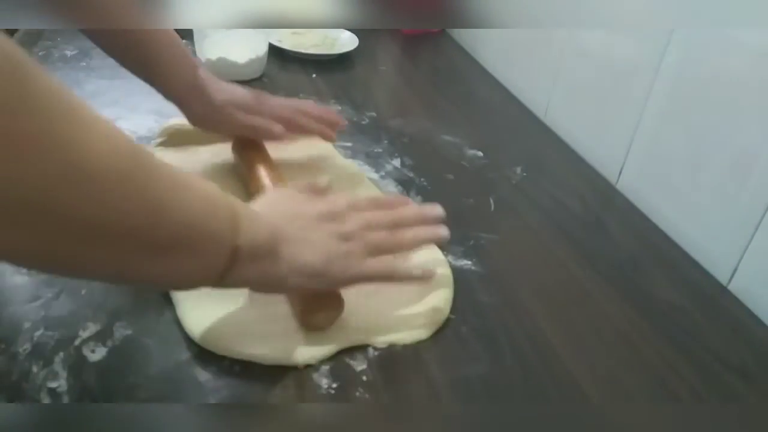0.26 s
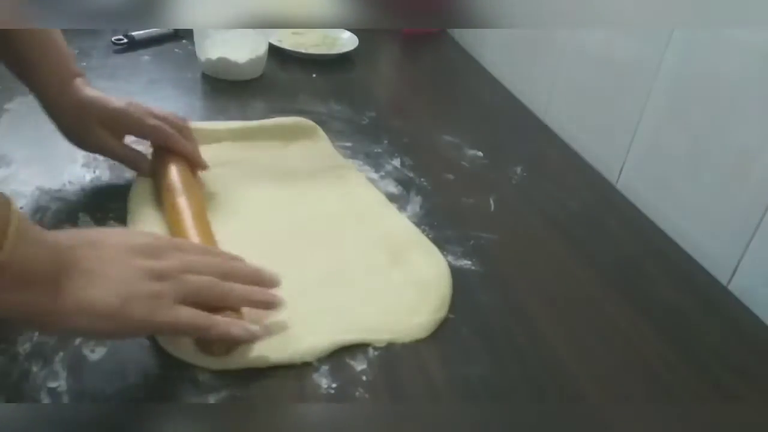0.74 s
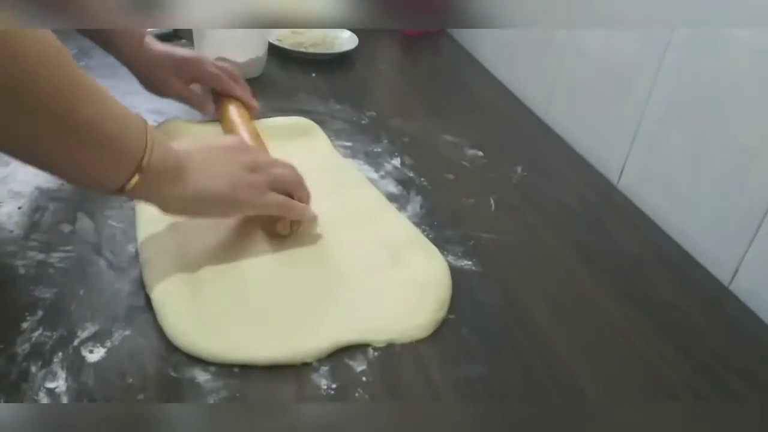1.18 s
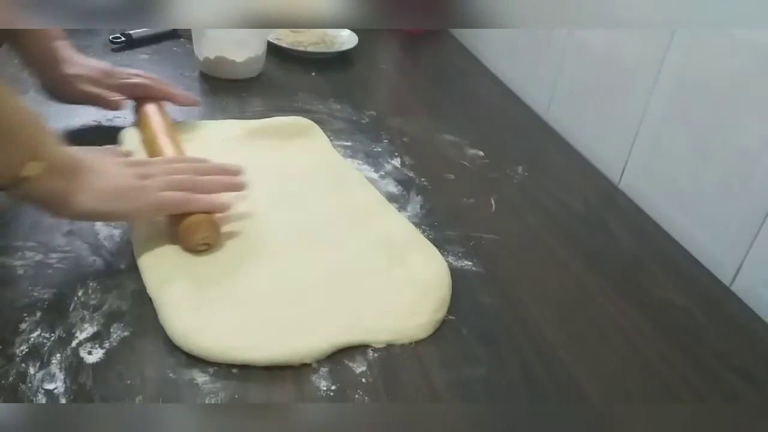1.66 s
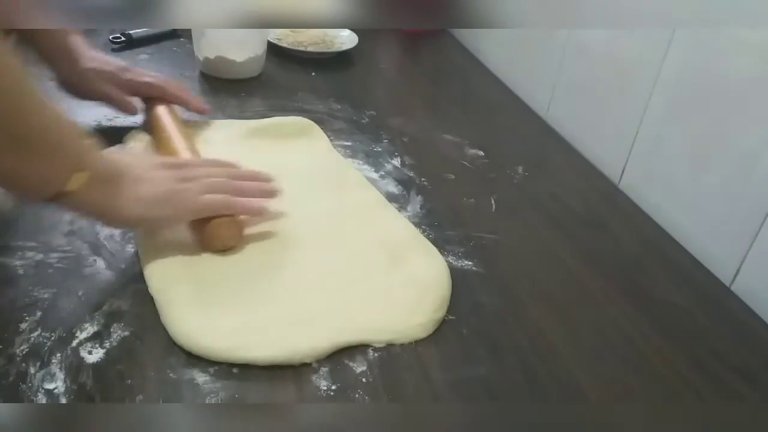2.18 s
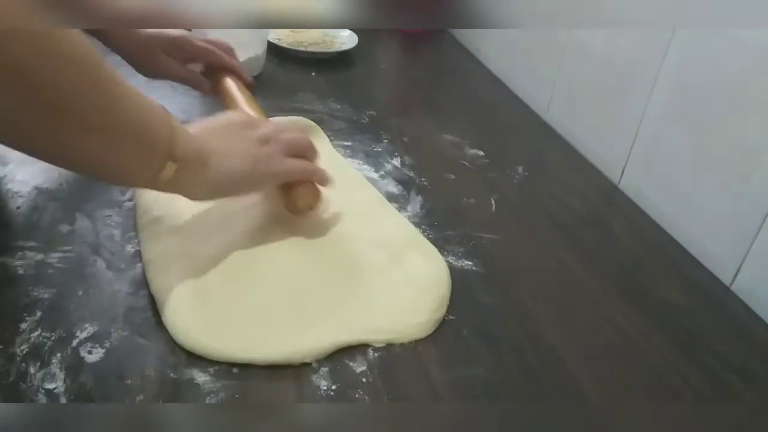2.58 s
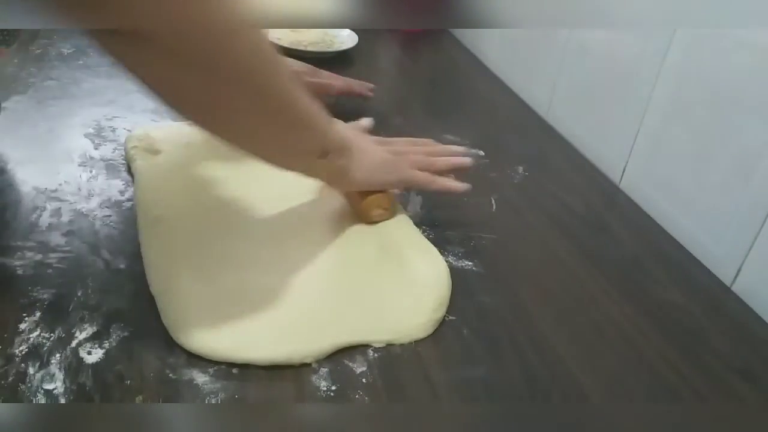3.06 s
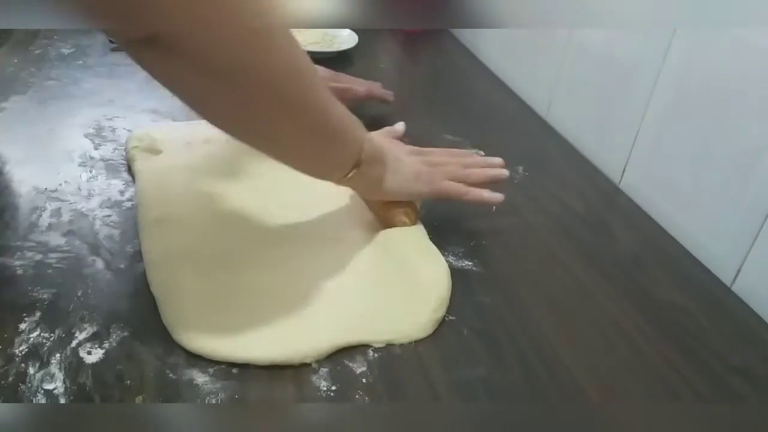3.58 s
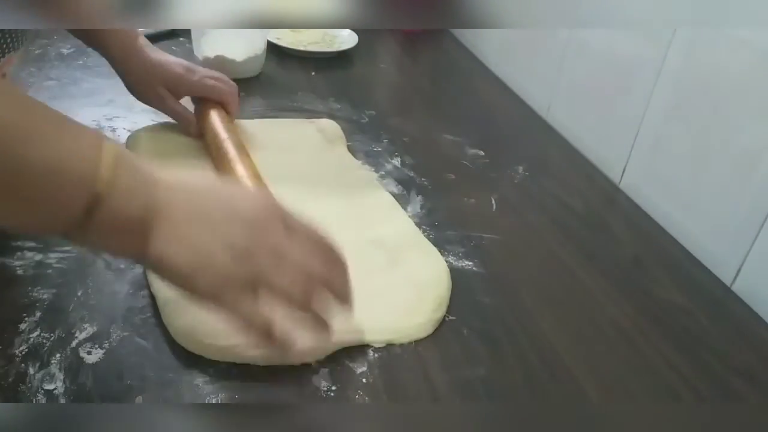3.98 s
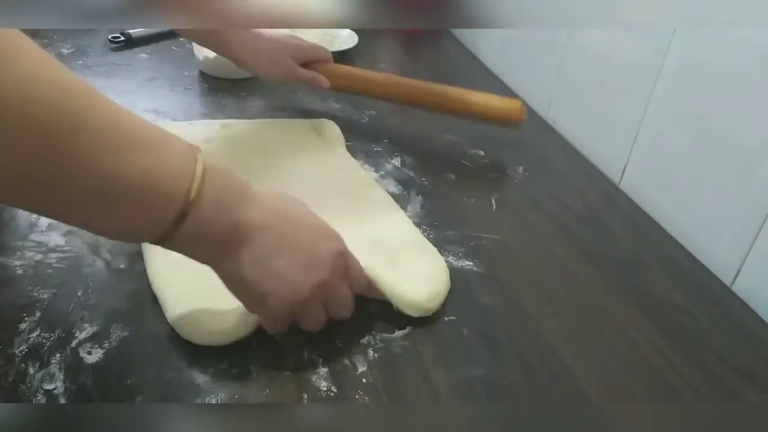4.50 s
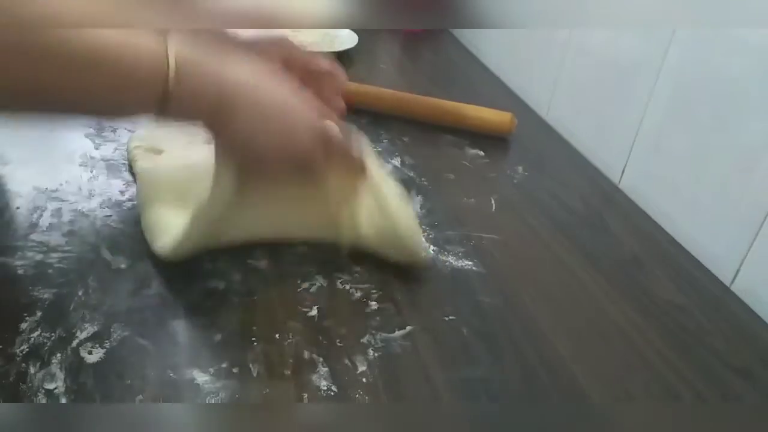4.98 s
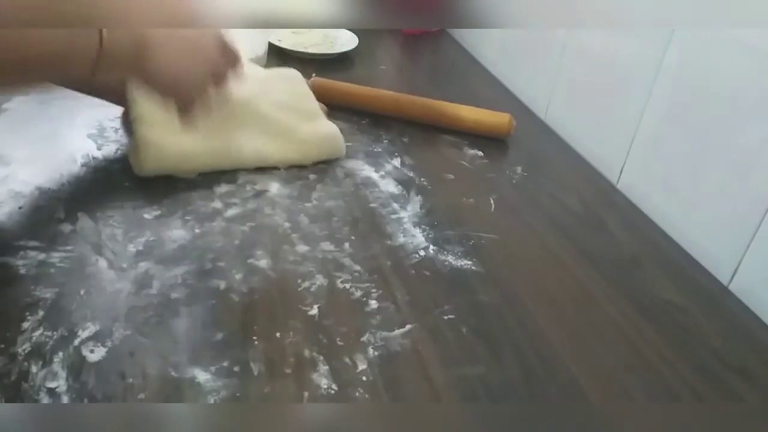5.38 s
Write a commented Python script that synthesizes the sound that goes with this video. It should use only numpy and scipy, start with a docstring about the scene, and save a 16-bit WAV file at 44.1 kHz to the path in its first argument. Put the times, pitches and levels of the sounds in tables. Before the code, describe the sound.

A wooden rolling pin works dough on a floured counter with soft rubs, dull thumps and knocks, then the sheet is lifted and flops down heavily.

```python
"""Small tiled kitchen: a wooden rolling pin flattens dough on a floured counter, close to a phone.
Palms rub the pin and flour crackles (shaped noise and sparse grains); pin and hands bump and knock, the pin
judders (filtered pulses, a wavering low tone), and the counter booms (decaying resonances, low noise).
Near the end the sheet of dough is peeled up, flaps against a hand and flops down folded."""
import sys
import numpy as np
from scipy import signal
from scipy.fft import rfft, irfft, next_fast_len
from scipy.io import wavfile
from scipy.ndimage import uniform_filter1d

SR = 44100
rng = np.random.default_rng(int(sys.argv[2]) if len(sys.argv) > 2 else 0)


def wav_out(sig):
    """Save sig, one row per channel (or a flat mono array), as 16-bit PCM at SR to the path in sys.argv[1]."""
    wavfile.write(sys.argv[1], SR, np.round(np.clip(np.atleast_2d(sig).T, -1, 1) * 32767).astype(np.int16))


N = 248591
T = np.arange(N) / SR
RING = 32768  # samples in one blow's response

# Flour spectrum: (frequency [Hz], level [dB])
FLOUR = [(2500, -8.5), (4000, -2.5), (4900, 3), (6000, 1), (7300, 4), (8700, 8), (9400, 5), (10300, -3.5),
         (11500, 0), (13000, -4)]
# Background noise spectrum: (frequency [Hz], level [dB])
QUIET = [(30, 4), (100, -4.5), (200, -8.5), (400, -11.5), (1000, -15), (3000, -20), (6000, -23),
         (13000, -28.5)]


def undb(db):
    """Decibels to gain."""
    return 10 ** (np.asarray(db) / 20)


def unit(x):
    """Scale to rms 1."""
    return x / np.sqrt(np.mean(x ** 2))


def at_hz(points, hz):
    """Read (Hz, value) points on a log-frequency axis."""
    f, value = np.transpose(points)
    return np.interp(np.log(hz + 1e-3), np.log(f), value)


def shape(x, spectrum):
    """Filter by (Hz, dB) points."""
    size = next_fast_len(len(x))
    gain = undb(at_hz(spectrum, np.fft.rfftfreq(size, 1 / SR)))
    return irfft(rfft(x, size) * gain, size)[:len(x)]


def colour(x, spectrum):
    """Give a steady sound a spectrum; rms 1."""
    return unit(shape(x, spectrum))


def band(x, hz, kind, order=2):
    """Smooth low-, high- or band-pass."""
    return signal.sosfilt(signal.butter(order, hz, kind, fs=SR, output="sos"), x)


def click(spectrum):
    """Minimum-phase pulse: the shortest causal one with this spectrum."""
    cepstrum = irfft(np.log(undb(at_hz(spectrum, np.fft.rfftfreq(RING, 1 / SR)))))
    cepstrum[1:RING // 2] *= 2
    cepstrum[RING // 2 + 1:] = 0
    return irfft(np.exp(rfft(cepstrum)))[:RING // 8]


def walk(rate_hz):
    """Smooth random wander of rms 1, with rate_hz new values per second."""
    size = int(SR / rate_hz)
    steps = np.repeat(rng.standard_normal(N // size + 1), size)
    return unit(uniform_filter1d(steps, size)[:N])


def add(out, s, x):
    """Mix x into out from time s."""
    i = int(s * SR)
    out[i:i + len(x)] += x[:N - i]


def swell(s, length_s, rise_share, sag_db, t60_s):
    """One movement: it rises for a share of its length, sags while it lasts, then dies away."""
    progress = np.clip((T - s) / length_s, 0, 1)
    attack = np.minimum(progress / rise_share, 1)
    release = np.exp(-np.log(1000) * np.maximum(T - s - length_s, 0) / t60_s)
    return attack * undb(-sag_db * progress) * release


def movements(rows, rise_share, sag_db, t60_s):
    """Loudness of (s, length s, dB) movements; where they overlap their powers add."""
    return np.sqrt(sum((undb(db) * swell(s, length_s, rise_share, sag_db, t60_s)) ** 2
                       for s, length_s, db in rows))


def contact(spread_s, crisp_hz=2500):
    """A soft surface lands as one push; its treble is spread over the moments its patches touch."""
    t = np.arange(RING // 32) / SR
    push = 1. * (t == 0)
    patches = rng.standard_normal(len(t)) * np.exp(-t / spread_s)
    patches /= np.linalg.norm(patches)
    return band(push, crisp_hz, "low") + band(patches, crisp_hz, "high")


def kitchen(direct_db, spread_s, wall_s=.0083, wall_db=-3, build_s=0.0032, diffuse_hz=170):
    """One contact: direct sound, one tiled-wall echo and a random dense tail."""
    # direct_db is relative to the tail's energy, wall_db to the direct sound
    # Reverberation: (frequency [Hz], t60 [s])
    reverb = [(80, 0.37), (210, 0.4), (560, 0.29), (1500, 0.32), (4000, 0.3), (12000, 0.28)]
    t, hz = np.arange(RING) / SR, np.fft.rfftfreq(RING, 1 / SR)
    noise = rfft(rng.standard_normal(RING))
    tail = 0
    for share, (_, t60_s) in zip(np.eye(len(reverb)), reverb):
        weight = at_hz([(f, w) for (f, _), w in zip(reverb, share)], hz)
        tail = tail + irfft(noise * weight) * np.exp(-np.log(1000) * t / t60_s)
    build = 1 - np.exp(-t / build_s)
    path = unit(band(tail, diffuse_hz, "high", order=1) * build) / np.sqrt(RING)
    add(path, 0, undb(direct_db) * contact(spread_s))
    add(path, wall_s, undb(direct_db + wall_db) * contact(spread_s))
    return path


def counter(ring_db=15, longest_t60_s=.55):
    """Decaying resonances that ring after each blow; their strengths vary by about 1 dB."""
    # Resonances: (frequency [Hz], level before ring_db [dB], t60 before the cap [s])
    resonances = [(60.5, -7, .6), (80, -18, 0.45), (95.6, -7, 0.44), (125.3, -5.5, 0.46), (135, -7, 0.34),
                  (140.8, -4.5, 0.24), (183.9, -5.5, 0.46), (274.4, -3.5, 0.38), (305, -8, 1),
                  (332.9, -2.5, 0.35), (368, -31, 0.99), (447, -24, 0.2), (427, -19, 0.58),
                  (551, -7.5, 0.36), (678, -19, 0.25), (852, -55, .3), (1059, -1.5, 0.22),
                  (1160, -3.5, 0.28), (1328, -4.5, 0.2), (1443, -25, 0.99), (1932, -1, 0.2),
                  (2140, -4.5, 0.48), (2324, -4.5, 0.24)]
    t = np.arange(RING) / SR
    out = 0
    for (hz, db, t60_s), chance_db in zip(resonances, rng.standard_normal(len(resonances))):
        decay = np.log(1000) / min(t60_s, longest_t60_s)
        gain = undb(ring_db + db + chance_db) * 2 * decay / SR
        out = out + gain * np.exp(-decay * t) * np.cos(2 * np.pi * hz * t)
    return out


def blows(rows, spectrum, direct_db, spread_s, alike):
    """Contacts, dulled by softness, ring counter and room; alike is the share of common echoes."""
    out, pulse, spot = np.zeros(N), click(spectrum), kitchen(direct_db, spread_s)
    for s, db, soft_hz, bass_hz, ring_db in rows:
        path = alike * spot + (1 - alike) * kitchen(direct_db, spread_s)
        x = signal.fftconvolve(path + undb(ring_db) * counter(), pulse)
        x = band(band(x, soft_hz, "low"), bass_hz, "high")
        add(out, s, undb(db) * x / np.std(x[:SR // 20]))  # level over the first 50 ms
    return out


def thumps_and_knocks():
    """Low thumps and knocks on the counter, from the pin and from hands."""
    # Knocks: (time [s], level [dB], low-pass [Hz], high-pass [Hz], relative counter ring [dB])
    knocks = [(0.352, -66, 106, 54.5, 8), (0.405, -65, 171, 72, 4), (0.667, -39, 135, 73.5, -10),
              (0.712, -38.5, 390, 94, -5), (0.890, -63.5, 393, 155, -11), (1.290, -65.5, 174, 110, 8),
              (1.345, -64.5, 171, 105, 19), (1.747, -51, 1210, 47.7, -32), (1.790, -44.5, 1880, 190, -8),
              (1.823, -58, 1200, 157, 23), (2.033, -54.5, 930, 215, -5.5), (2.078, -63, 397, 316, 7),
              (2.376, -52, 280, 94.5, 1.5), (2.420, -44.5, 114, 80, -10), (2.750, -64.5, 138, 80, 21),
              (3.226, -42, 127, 70.4, 17), (3.239, -48.5, 2330, 221, -33), (3.253, -59, 700, 149, -8),
              (3.2688, -40.5, 2060, 310, -0.5), (3.277, -63, 1770, 616, 15), (3.301, -59, 2070, 520, 9),
              (4.563, -66.5, 150, 80, 23), (4.675, -59.5, 750, 150, -23), (4.692, -58, 670, 141, -12),
              (4.846, -62.5, 181, 90, 19)]
    # Contact spectrum: (frequency [Hz], level [dB])
    knock_spectrum = [(45, -14), (65, 11.5), (110, 6.5), (150, 0.5), (200, -0.5), (270, -2.5), (350, -1),
                      (470, -8.5), (750, -10.5), (900, -18.5), (1100, -16.5), (1600, -15.5), (2100, -23),
                      (3000, -27), (6000, -19), (12000, -16)]
    return blows(knocks, knock_spectrum, direct_db=-12.5, spread_s=0.00096, alike=0.13)


def rolling(trim_db=-0.9):
    """Pushes that bear down on the counter make it rumble: low noise under their envelopes."""
    # Pushes: (time [s], length [s], level before trim [dB])
    pushes = [(0.0, 0.24, -74.5), (0.325, 0.16, -66), (0.93, .2, -71), (1.26, 0.19, -65), (2.13, 0.36, -73),
              (2.6, 0.32, -68.5), (3.44, 0.075, -66), (3.7, 0.44, -76.5), (4.28, 0.13, -69),
              (4.66, 0.63, -66), (5.5, .14, -69)]
    # Rumble spectrum: (frequency [Hz], level [dB])
    rumble = [(25, -29), (45, -17), (75, 8.5), (105, 8.5), (135, 12.5), (190, -8), (300, -8), (500, -28),
              (1000, -29.5)]
    weight = movements(pushes, rise_share=0.078, sag_db=-0.5, t60_s=0.76)
    return colour(rng.standard_normal(N), rumble) * undb(trim_db) * weight


def judder(slip_hz=155, jitter=0.0205, second_db=-23, third_db=-28, rough_db=-21):
    """Stick-slip of the pin: a short, nearly pure groan of wavering pitch, with faint scrape noise."""
    # Catches and slips: (time [s], length [s], level [dB])
    slips = [(2.295, 0.073, -56.5), (2.372, .11, -40), (2.52, 0.035, -47.5)]
    phase = 2 * np.pi * np.cumsum(slip_hz * (1 + jitter * walk(50.5))) / SR
    second = undb(second_db) * np.sin(2 * phase) * walk(41)
    third = undb(third_db) * np.sin(3 * phase) * walk(33)
    groan = unit(np.sin(phase) + second + third)
    scrape = unit(band(rng.standard_normal(N), [170, 380], "band"))
    slipping = movements(slips, rise_share=0.23, sag_db=4, t60_s=0.19)
    return (groan + undb(rough_db) * scrape) * slipping


def drift(x, patchy_db=2.0, size=512):
    """Hollows under the moving hands keep changing, so soft resonances come and go."""
    frames = signal.stft(x, nperseg=size)[2]
    chance = rng.standard_normal(frames.shape)
    chance = uniform_filter1d(chance, size=4, axis=0)  # across frequency
    chance = unit(uniform_filter1d(chance, size=16, axis=1))  # across time
    return signal.istft(frames * undb(patchy_db * chance), nperseg=size)[1][:N]


def rubbing(hiss_trim_db=-0.05, skin_trim_db=-2.5, grain_db=3.5, grains_per_s=4000,
            flicker_db=1.35, wash_db=3):
    """Flour slips under skin and dough: sparse random grains over a dense noise wash."""
    # Strokes: (time [s], length [s], flour hiss before trim [dB], lower skin rub before trim [dB])
    strokes = [(0, .06, -68.5, -74.5), (0.093, .11, -70.5, -67.5), (0.32, 0.15, -75.5, -73),
               (0.434, 0.031, -58, -67), (0.619, .075, -73.5, -64), (0.843, 0.13, -83, -71),
               (0.927, .26, -64, -63.5), (1.185, .15, -64, -63.5), (1.399, 0.069, -76, -70),
               (1.533, 0.058, -74, -68), (1.707, 0.14, -71, -65), (1.998, 0.09, -78, -64),
               (2.055, .21, -61.5, -64.5), (2.345, 0.2, -65.5, -70.5), (2.661, .15, -67, -75),
               (2.893, 0.068, -64.5, -67), (3.147, 0.072, -81, -68.5), (3.214, 0.047, -67, -61),
               (3.33, .19, -68.5, -64.5), (3.615, 0.11, -67.5, -70.5), (3.789, .11, -77, -67.5),
               (3.967, 0.16, -69.5, -71.5), (4.199, 0.22, -69, -65), (4.52, .07, -77, -72),
               (4.638, 0.076, -73.5, -67.5), (4.748, .1, -69, -64), (4.828, .18, -65.5, -63.5),
               (5.112, 0.17, -68, -73), (5.47, .16, -56.5, -60.5)]
    # Skin rub spectrum: (frequency [Hz], level [dB])
    skin_spectrum = [(300, -7), (700, -4), (1150, -6.5), (1750, -0.5), (2200, -4.5), (3100, -2),
                     (4200, -3.5), (7000, -14.5)]
    starts, lengths, hiss_db, skin_db = np.transpose(strokes)
    # last column, floor_db: a faint steady hiss continues between strokes
    layers = ((FLOUR, hiss_trim_db + hiss_db, -86.5), (skin_spectrum, skin_trim_db + skin_db, -87))
    out = 0
    for spectrum, db, floor_db in layers:
        sliding = movements(zip(starts, lengths, db), rise_share=0.37, sag_db=2, t60_s=0.31)
        sizes = undb(grain_db * np.minimum(rng.exponential(size=N), 4)) * rng.standard_normal(N)
        grains = unit(sizes * (rng.random(N) < grains_per_s / SR))
        wash = undb(wash_db) * rng.standard_normal(N)
        loudness = np.hypot(sliding, undb(floor_db)) * undb(flicker_db * walk(40))
        out = out + colour(grains + wash, spectrum) * loudness
    return drift(out)


def brushes():
    """Short strokes of skin on wood; a hollow hand picks out one note: band-passed noise."""
    # Strokes: (time [s], length [s], centre [Hz], width [Hz], level [dB])
    notes = [(0.172, 0.031, 4800, 900, -66), (1.259, 0.046, 1890, 150, -64.5),
             (1.426, 0.012, 3100, 170, -64), (2.089, 0.08, 2550, 160, -63), (2.19, 0.068, 5130, 900, -66),
             (3.47, 0.083, 2300, 400, -77), (3.613, 0.073, 1540, 150, -76.5), (3.851, 0.04, 3800, 280, -67),
             (4.299, 0.03, 1610, 140, -70.5), (4.551, 0.038, 1780, 90, -73),
             (4.552, 0.025, 3120, 140, -70.5)]
    out = np.zeros(N)
    for s, length_s, hz, width_hz, db in notes:
        edges_hz = [hz - width_hz / 2, hz + width_hz / 2]
        hiss = unit(band(rng.standard_normal(N), edges_hz, "band", order=1))
        out += undb(db) * hiss * swell(s, length_s, rise_share=0.17, sag_db=2, t60_s=0.22)
    return out


def palm_slaps():
    """Palms slap down: bright, briefly spread contacts."""
    # Slaps: (time [s], level [dB], low-pass [Hz], high-pass [Hz], relative counter ring [dB])
    slaps = [(0.6685, -39, 13900, 155, -16), (0.679, -40.5, 8850, 108, 2.5)]
    # Contact spectrum: (frequency [Hz], level [dB])
    palm = [(29, -27), (50, -26), (136, 2.5), (222, -14.5), (322, -3.5), (370, -16), (456, -7),
            (603, -14.5), (662, -7), (1180, -19), (1390, -20), (3220, -19.5), (13000, -34.5)]
    return blows(slaps, palm, direct_db=-13.0, spread_s=0.0011, alike=0.041)


def dough_flaps():
    """The lifted sheet flaps against a hand: contacts strongest in the midrange."""
    # Flaps: (time [s], level [dB], low-pass [Hz], high-pass [Hz], relative counter ring [dB])
    flaps = [(5.0605, -46.5, 9300, 403, 6), (5.069, -44.5, 9000, 490, -30), (5.088, -51.5, 3950, 900, 2)]
    # Contact spectrum: (frequency [Hz], level [dB])
    sheet = [(200, -51), (330, -11.5), (600, -7.5), (850, -5.5), (1100, -9), (1450, -1.5), (1900, -2),
             (2400, -5), (3200, -9.5), (5000, -20), (9000, -25.5), (13000, -28)]
    return blows(flaps, sheet, direct_db=-7, spread_s=0.0015, alike=0.045)


def dough_flops():
    """The sheet flops down folded: soft, widely spread contacts that share all their echoes."""
    # Flops: (time [s], level [dB], low-pass [Hz], high-pass [Hz], relative counter ring [dB])
    flops = [(5.2335, -27, 12800, 117, 0.0046), (5.27358, -29.5, 11000, 112, 0.012),
             (5.351, -35, 525, 118, 0)]
    # Contact spectrum: (frequency [Hz], level [dB])
    fold = [(35, -64), (60, -6), (95, -19), (129, -4), (226, -5.5), (271, -3), (371, -7), (420, 0.5),
            (835, -7.5), (1310, -8.5), (2000, -13), (2600, -19.5), (3300, -23.5), (5000, -35.5),
            (8000, -42), (13000, -41.5)]
    return blows(flops, fold, direct_db=-7.5, spread_s=0.0047, alike=1.0)


def ticks(spread_s=0.0029):
    """Dough unsticking and dry crumbs: small bright crackles in the room."""
    # Crackles: (time [s], level [dB])
    crackles = [(1.429, -74), (1.748, -68), (2.2, -58.5), (3.227, -60.5), (3.654, -66), (4.563, -70.5),
                (4.673, -68.5), (4.884, -58), (4.959, -67), (5.543, -56)]
    out, pulse = np.zeros(N), click(FLOUR)
    for s, db in crackles:
        x = signal.fftconvolve(kitchen(0, spread_s, wall_db=-13), pulse)
        add(out, s, undb(db) * x / np.std(x[:SR // 50]))  # level over the first 20 ms
    return out


def background(level_db):
    """Steady noise, strongest in the bass."""
    return undb(level_db) * colour(rng.standard_normal(N), QUIET)


def scatter(x, fade_s=0.028):
    """Early reflections with random phases: a decaying noise response of unit energy."""
    t = np.arange(RING // 4) / SR
    echoes = rng.standard_normal(len(t)) * np.exp(-t / fade_s)
    return signal.fftconvolve(x, echoes / np.linalg.norm(echoes))[:N]


def scene(quiet_db=-75, port_noise_db=-90):
    """Sources sit in the middle; mostly treble reflections and faint self-noise part the two ports."""
    # Port difference: (frequency [Hz], side minus mid [dB])
    port_difference = [(300, -103), (700, -77), (1100, -41), (1850, -11.5), (2300, -19.5), (2900, -57),
                       (3800, -53), (4400, -11), (7000, -6), (13000, -6)]
    hits = thumps_and_knocks() + palm_slaps() + dough_flaps() + dough_flops()
    mid = hits + rolling() + judder() + rubbing() + brushes() + ticks() + background(quiet_db)
    side = shape(scatter(mid), port_difference) + background(port_noise_db)
    return np.array([mid + side, mid - side])


def record(dry, bass_hz=40, top_hz=13230):
    """The phone drops the deepest bass and cuts the top steeply."""
    low_pass = signal.ellip(10, .2, 70, top_hz, fs=SR, output="sos")
    return signal.sosfilt(low_pass, band(dry, bass_hz, "high"))


dry = scene()
out = record(dry)
wav_out(out)
```